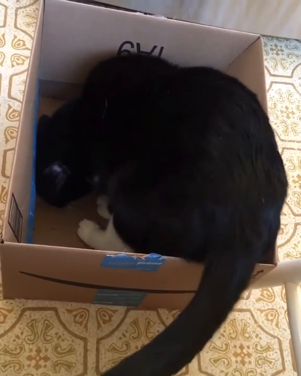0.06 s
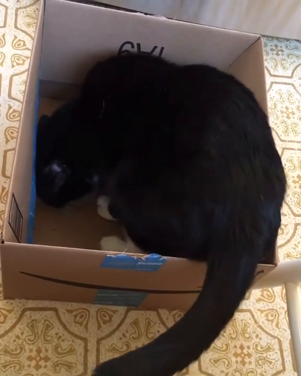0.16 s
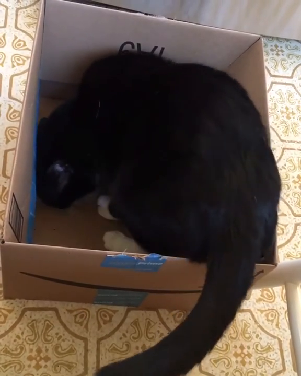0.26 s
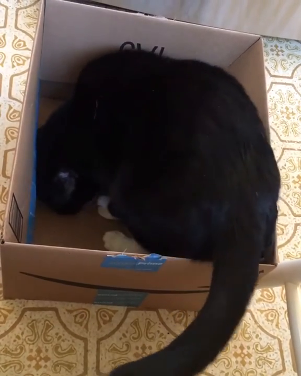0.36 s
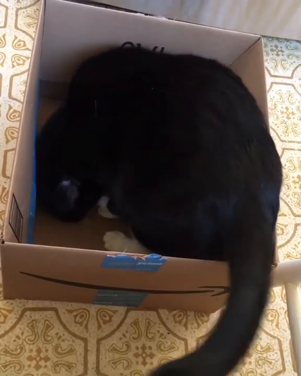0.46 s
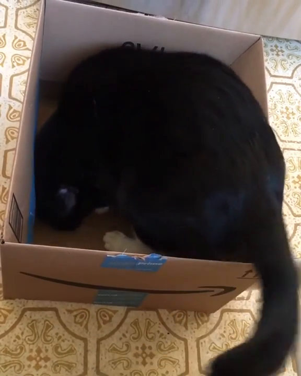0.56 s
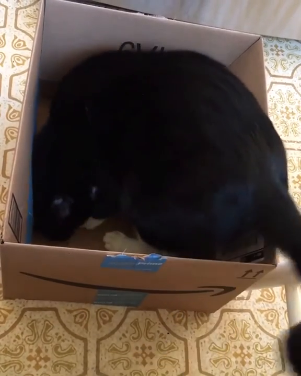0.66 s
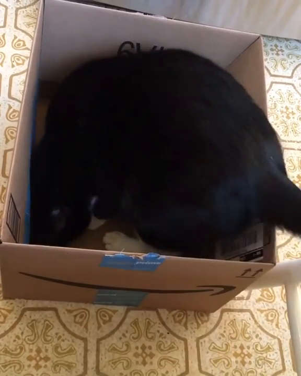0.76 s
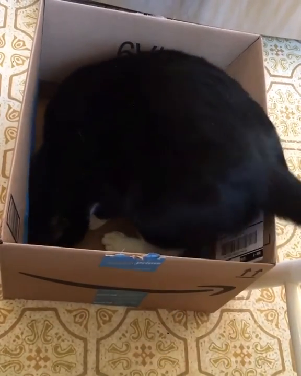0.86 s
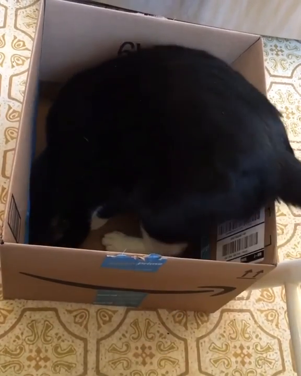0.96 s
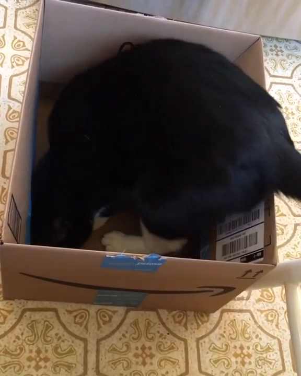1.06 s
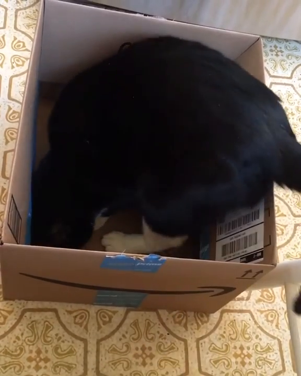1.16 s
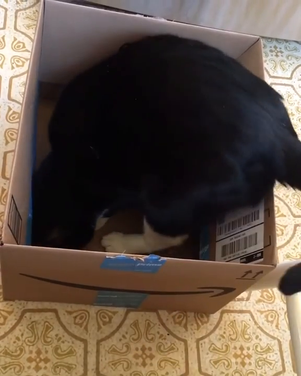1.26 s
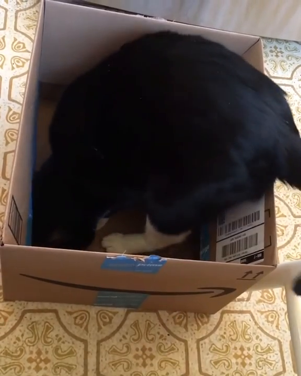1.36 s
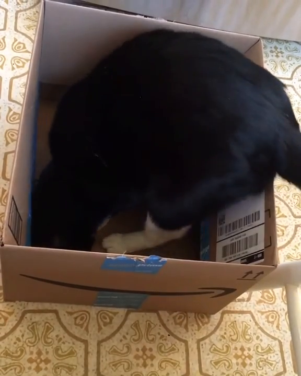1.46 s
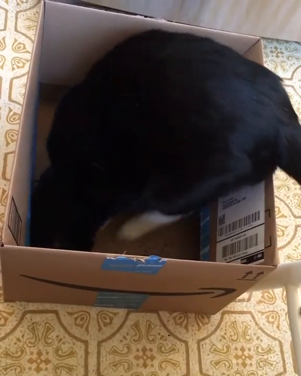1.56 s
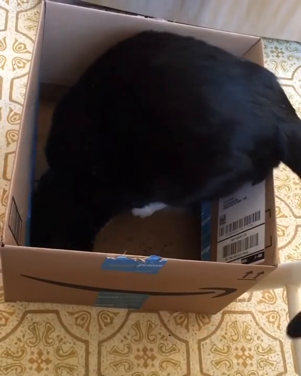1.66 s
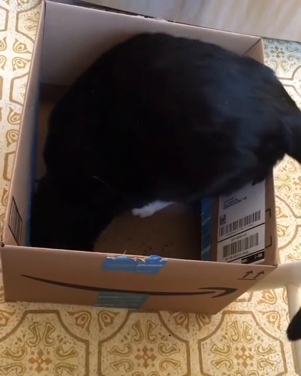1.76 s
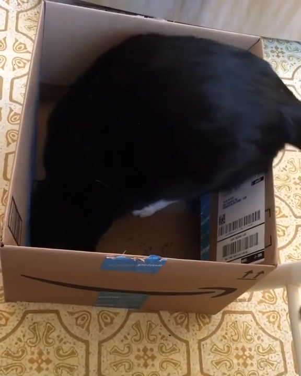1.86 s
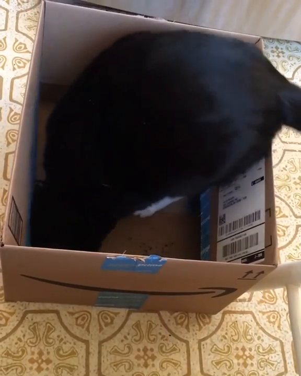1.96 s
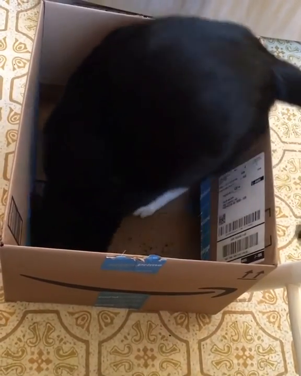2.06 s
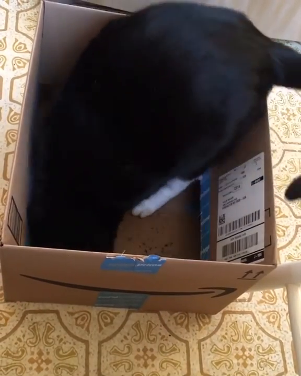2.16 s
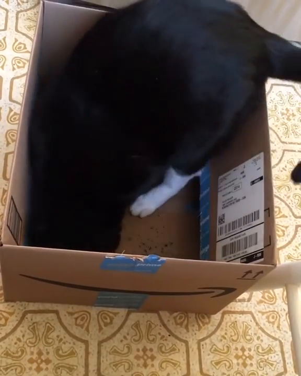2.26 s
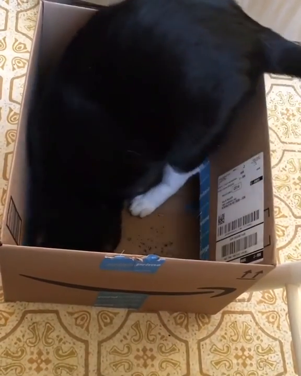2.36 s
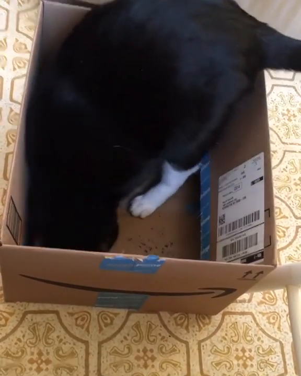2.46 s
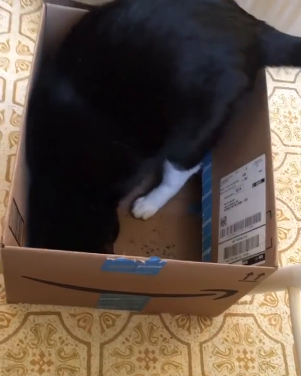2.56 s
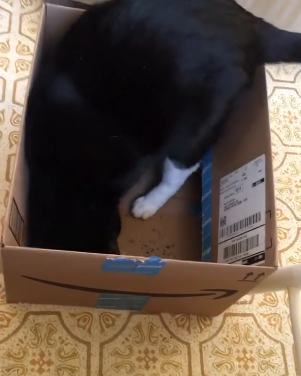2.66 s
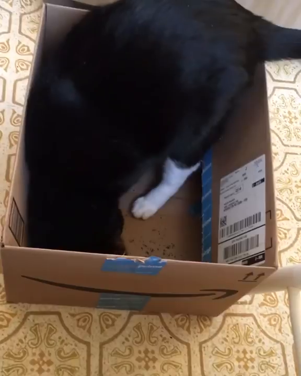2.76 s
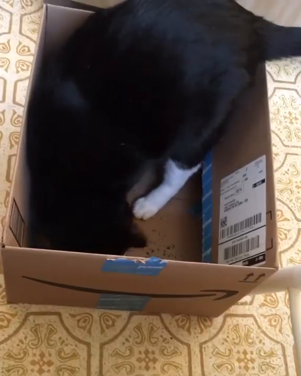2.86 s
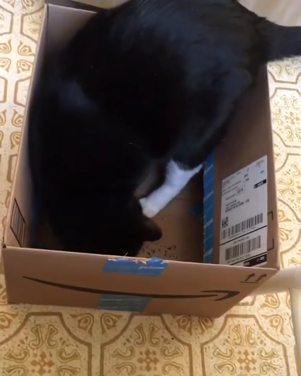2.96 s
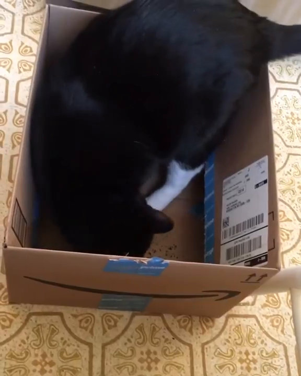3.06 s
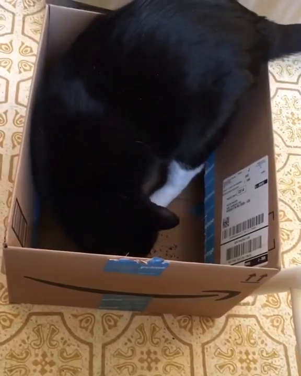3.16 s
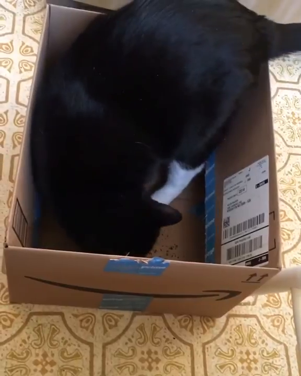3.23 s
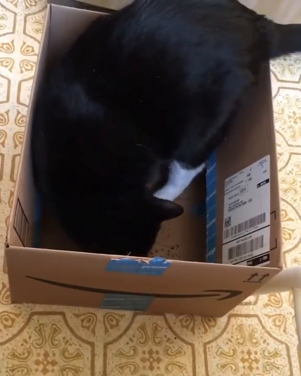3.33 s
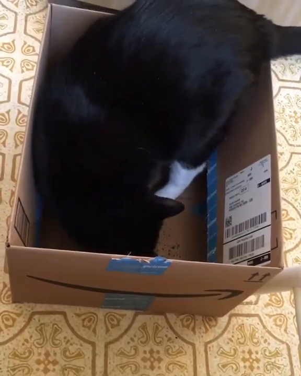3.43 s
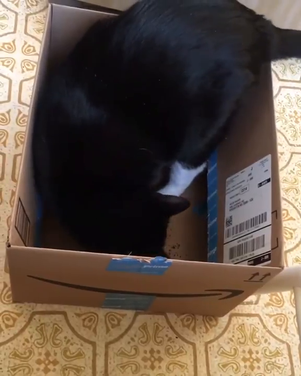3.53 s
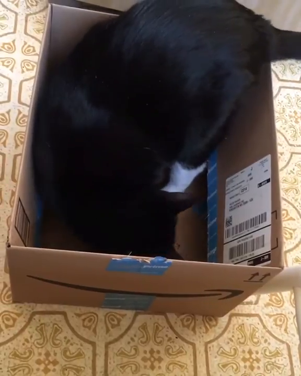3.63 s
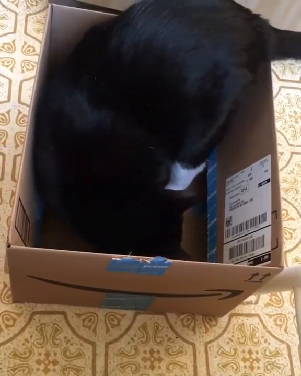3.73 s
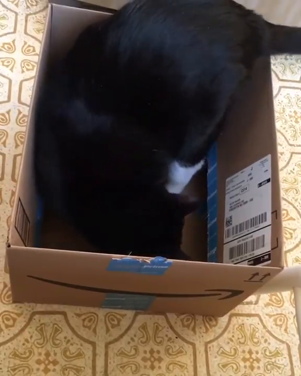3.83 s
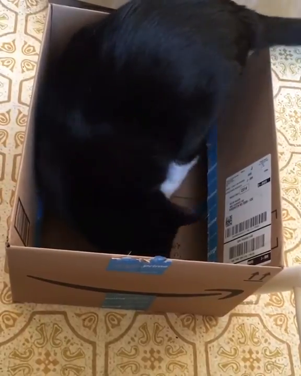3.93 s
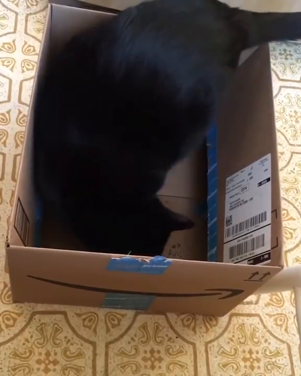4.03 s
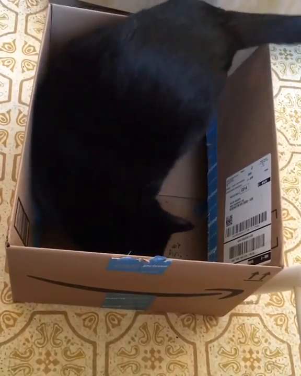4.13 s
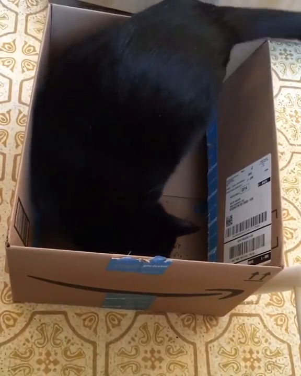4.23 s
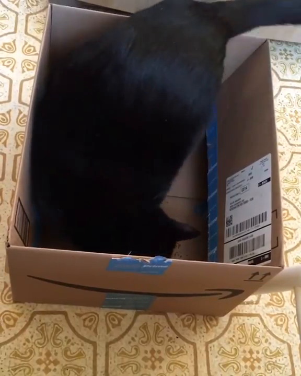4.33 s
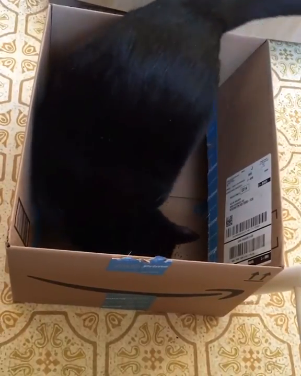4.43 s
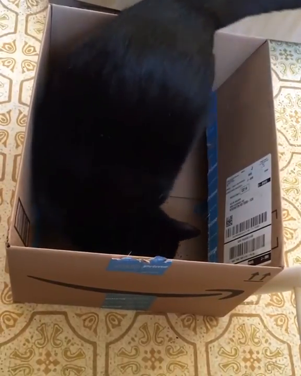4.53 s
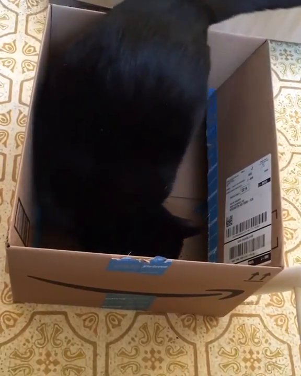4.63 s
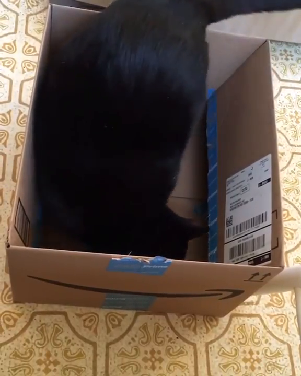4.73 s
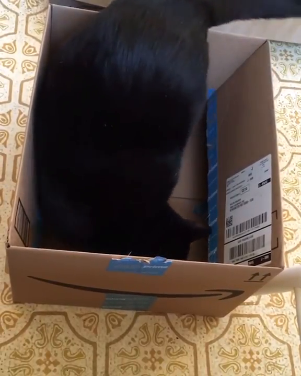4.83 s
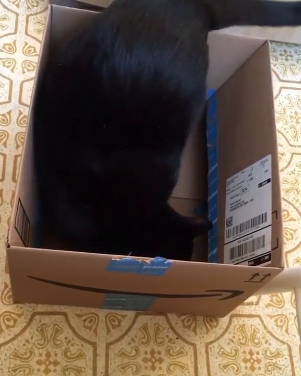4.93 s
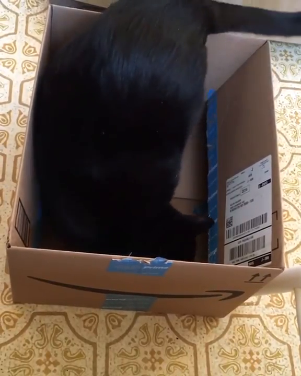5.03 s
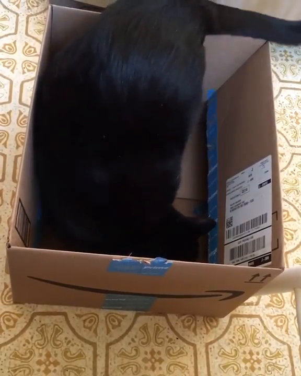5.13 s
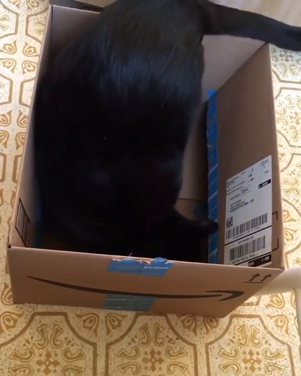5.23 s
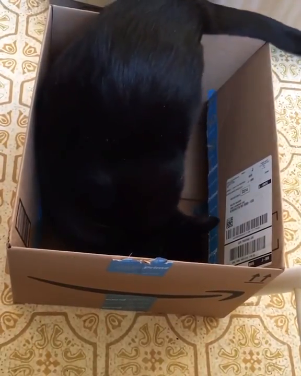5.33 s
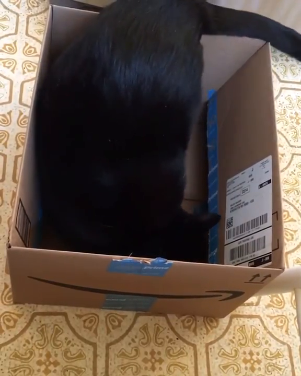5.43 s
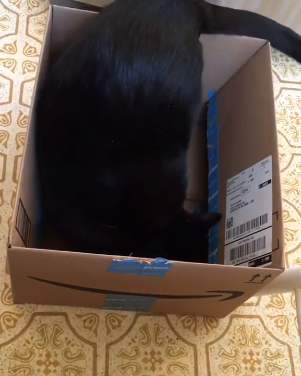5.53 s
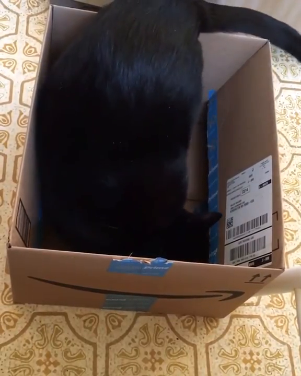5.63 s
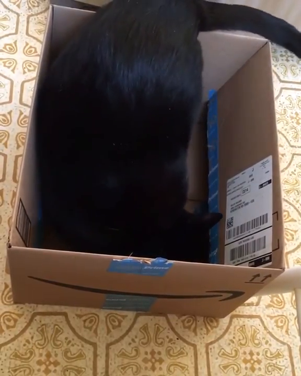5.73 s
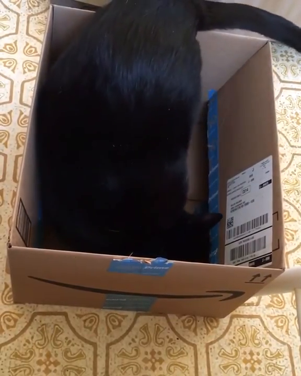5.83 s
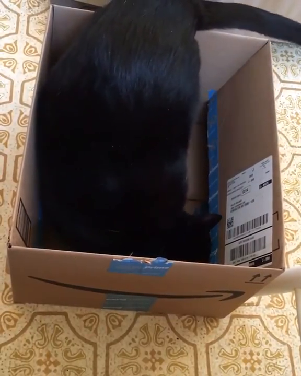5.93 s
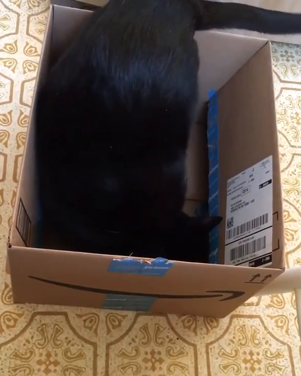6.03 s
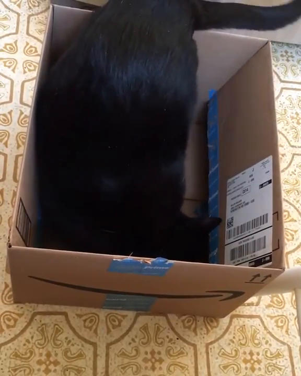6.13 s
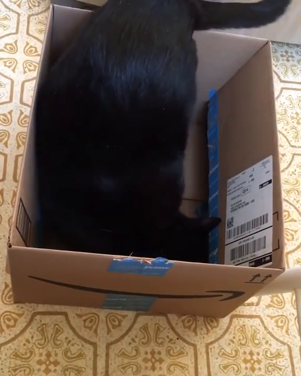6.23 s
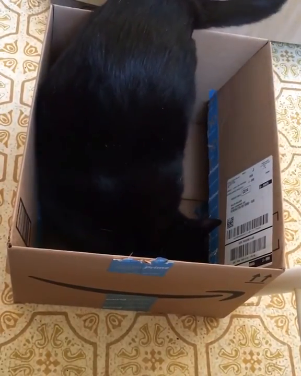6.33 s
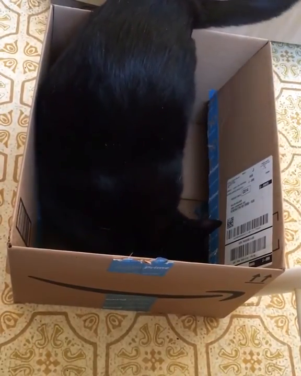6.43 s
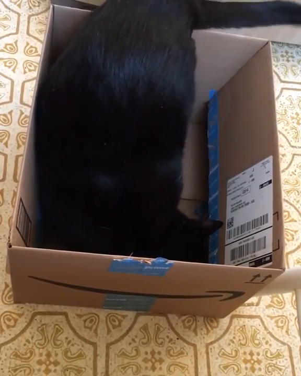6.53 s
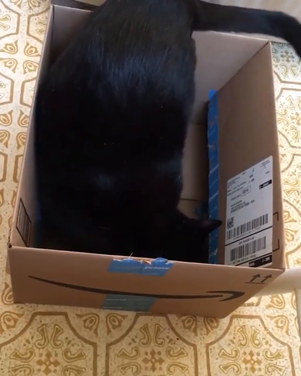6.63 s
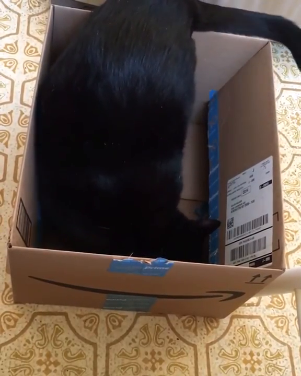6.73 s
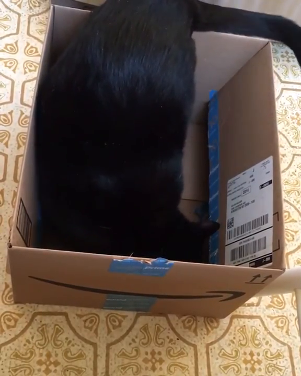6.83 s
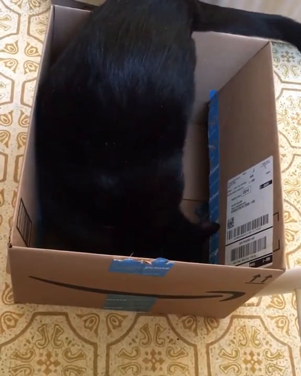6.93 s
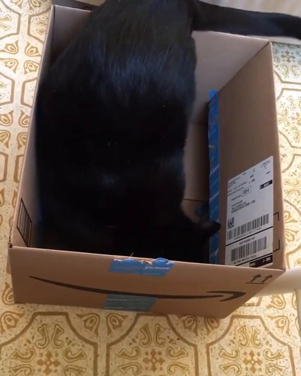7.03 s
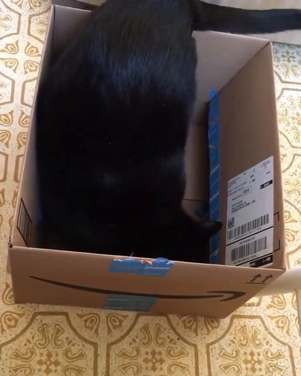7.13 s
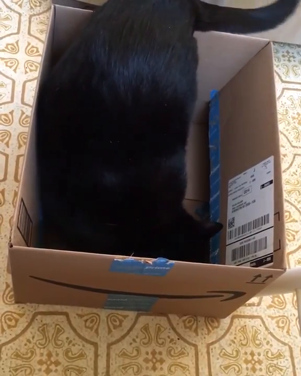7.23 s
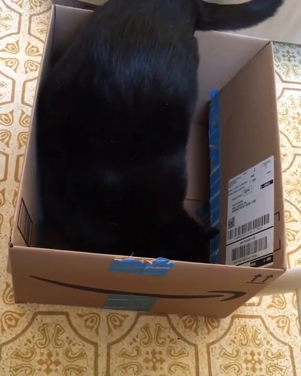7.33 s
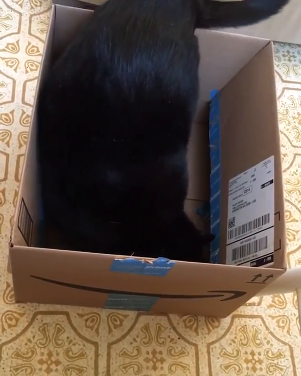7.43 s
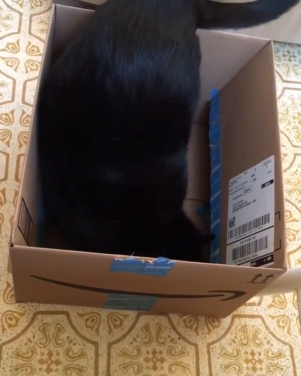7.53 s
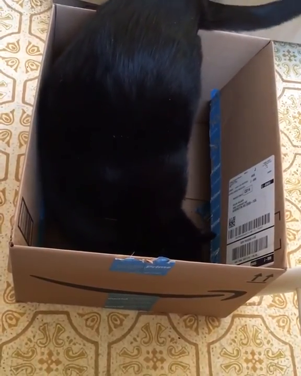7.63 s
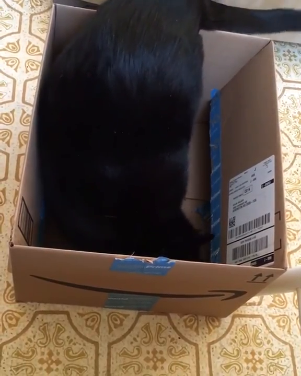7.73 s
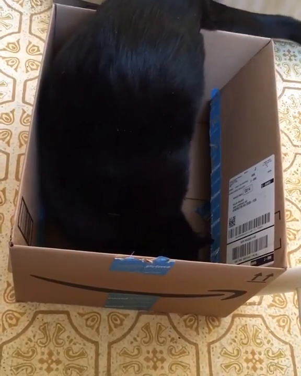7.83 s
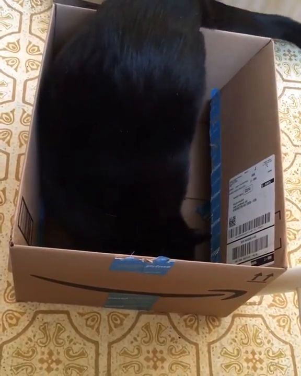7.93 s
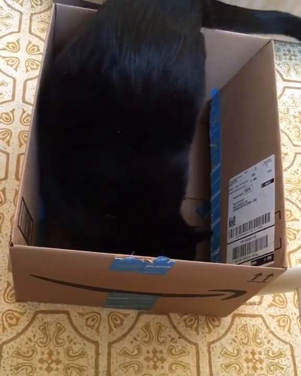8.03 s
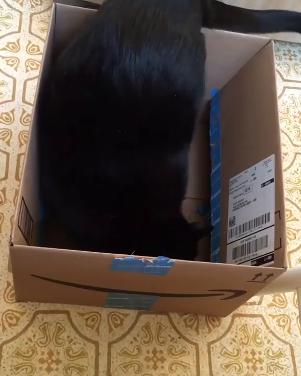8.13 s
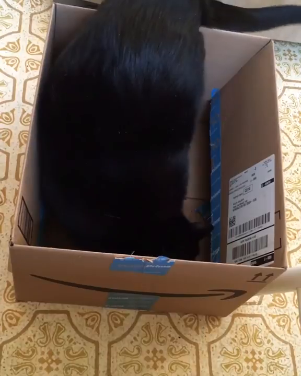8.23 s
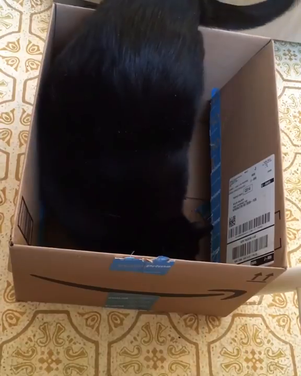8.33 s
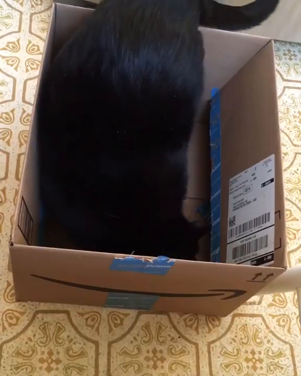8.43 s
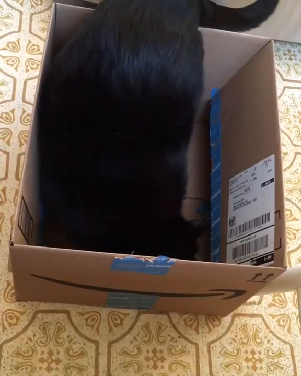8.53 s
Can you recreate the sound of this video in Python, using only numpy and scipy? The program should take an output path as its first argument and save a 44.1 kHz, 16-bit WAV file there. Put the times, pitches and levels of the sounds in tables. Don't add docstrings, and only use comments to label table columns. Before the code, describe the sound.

Close up, a cat turns in a cardboard box on a hard indoor floor. Fur brushes the walls, paws scuff, claws tick and snap the card. Around two seconds a sharp claw scrape and knock lands with a dull thump, the loudest moment. Afterwards come sparse crackles and small knocks over a steady low appliance hum and soft room rumble.

```python
import sys
import numpy as np
from scipy import signal
from scipy.fft import rfft, irfft
from scipy.io import wavfile

SR = 44100
rng = np.random.default_rng(int(sys.argv[2]) if len(sys.argv) > 2 else 0)


def level_to_linear(level):
    exponent = np.asarray(level, float) / 20
    return 10 ** exponent


def log_audio(samples):
    frames = np.atleast_2d(samples).T
    limited = np.clip(frames, -1, 1)
    pcm = np.round(limited * 32767).astype(np.int16)
    wavfile.write(sys.argv[1], SR, pcm)


N = 378819


def rms_one(x):
    return x / np.sqrt(np.mean(x ** 2) + 1e-20)


def at_hz(points, hz):
    points_hz, points_db = np.transpose(points)
    return np.interp(np.log(hz), np.log(points_hz), points_db)


def resonance(x, hz, width_hz):
    r = np.exp(-np.pi * width_hz / SR)
    top = [(1 - r * r) / 2, 0, (r * r - 1) / 2]
    return signal.lfilter(top, [1, -2 * r * np.cos(2 * np.pi * hz / SR), r * r], x)


def drift(rate_hz):
    r = np.exp(-2 * np.pi * rate_hz / SR)
    noise = rng.standard_normal(N + SR)
    return rms_one(signal.lfilter([1], [1, -2 * r, r * r], noise)[SR:])


def add(track, s, shape):
    at = max(round(s * SR), 0)
    track[..., at:at + shape.shape[-1]] += shape[..., :N - at]


def coloured(kind, level_db, *extra_db):
    colour_db, reach = kind
    return level_db + np.array(colour_db) + np.array(extra_db) @ np.array(reach)


def rub(power, kind, rows):
    for centre, half, *own_db in rows:
        t = np.arange(-2 * half, 3 * half, 1 / SR)
        bell = np.exp(-(t / np.where(t < 0, 0.54 * half, 1.17 * half)) ** 2)
        add(power, centre - 2 * half, level_to_linear(2 * coloured(kind, *own_db))[:, None] * bell)


# [t/s, level/dB]
FUR_PRESSURE = [(0.0, -69), (0.53, -73), (0.83, -61), (1.29, -66.5), (1.96, -63.5), (2.22, -69), (3.3, -77),
                (3.85, -74.5), (4.21, -71.5), (4.43, -79), (4.81, -77), (5.33, -77), (5.74, -73),
                (6.51, -76.5), (6.79, -73), (7.75, -76), (7.94, -72.5), (8.59, -74)]
LIGHT_TOUCH = [-73.5, -76.5, -79.5, -73.5]
PRESSURE_SHARE = [.35, .55, .9, 1.0]


def brushing():
    light_db, restless_db, restless_per_s = -76.5, 1, 2.5
    press_db = np.interp(np.arange(N) / SR, *np.transpose(FUR_PRESSURE)) - light_db
    press_db = press_db + restless_db * drift(restless_per_s)
    zones = zip(LIGHT_TOUCH, PRESSURE_SHARE)
    return np.array([level_to_linear(2 * (rest_db + share * press_db)) for rest_db, share in zones])


# [centre t/s, half length t/s, level/dB, weight level/dB]
FUR_STROKES = [(0.764, .02, -53.5, -10.5), (1.39, .015, -64, -20), (1.677, .012, -49, -16.5),
               (1.706, .013, -45.5, -19), (1.817, 0.017, -59, -8), (4.155, 0.014, -53.5, -14.5),
               (5.04, 0.024, -64.5, -7), (5.733, 0.04, -61.5, -9), (5.892, .018, -63, -16),
               (6.548, .011, -65, -2), (6.81, 0.052, -61, -32), (7.406, .079, -61, -21),
               (7.842, .016, -57.5, -9.5), (7.863, .04, -61, -28), (7.792, .015, -64, -28),
               (7.994, .012, -66, -8), (1.563, 0.034, -60, -7), (1.9, 0.046, -62, -13),
               (2.97, 0.048, -71, -12), (4.283, 0.14, -65.5, -9), (4.66, 0.065, -66.5, -12),
               (5.236, .03, -71.5, -12), (8.156, 0.057, -71, -13)]
FUR_COLOUR = [2, -1.1, -1.3, -0.44], [[1.01, 0.86, 0.48, 0]]


def fur_strokes(power):
    rub(power, FUR_COLOUR, FUR_STROKES)


# [centre t/s, half length t/s, level/dB, weight level/dB]
PAW_SCUFFS = [(0.148, 0.011, -55, -7.5), (0.277, 0.019, -58.5, -6), (0.572, 0.017, -52, -7.5),
              (0.938, 0.021, -48.5, -3.5), (2.425, 0.016, -61, -1), (2.706, 0.016, -61.5, -5),
              (4.019, 0.025, -61, -4), (4.2, .01, -66, -7), (4.587, .014, -63, -3), (4.762, .009, -54, -19),
              (4.803, 0.034, -62, -4), (4.403, .012, -62.5, 2)]
PAD_COLOUR = [-4, -2, -1.1, -1], [[1.01, 0.84, 0, 0.0041]]


def paw_scuffs(power):
    rub(power, PAD_COLOUR, PAW_SCUFFS)


# [centre t/s, half length t/s, level/dB, wall level/dB, tearing level/dB]
CLAW_DRAGS = [(0.643, .0086, -59.5, -8, 0), (.848, 0.015, -63, -1, -10), (2.032, .007, -50, -13, 7),
              (2.049, .019, -42, -12, 0), (2.091, 0.039, -58, 2.5, 2), (2.169, .015, -61, 0, -5),
              (4.395, 0.015, -57, -10, 1), (5.952, 0.013, -67, -19, -6), (6.88, .02, -75, 8, -1),
              (.8, 0.035, -64, -2, 2), (.89, .03, -67, 2, 0), (1.863, .03, -68.5, 4, -3),
              (2.2, .035, -71, -1, -10), (2.44, .018, -71, -8, -3), (4.03, 0.021, -69, -9, -3),
              (5.07, .02, -70, -4, -5)]
CLAW_COLOUR = [0.3, 0.5, -8.5, -1], [[1, 0, 0, 0.048], [0, 0, 0.21, 1]]


def claw_drags(power):
    rub(power, CLAW_COLOUR, CLAW_DRAGS)


def friction():
    power = brushing()
    fur_strokes(power)
    paw_scuffs(power)
    claw_drags(power)
    return np.sqrt(power)


# [t/s, level/dB, weight behind it level/dB]
FIBRE_TICKS = [(0.018, -56, -9), (0.5651, -67, -9), (0.6434, -62, -7), (0.736, -46, -22),
               (0.7582, -57, -12), (1.671, -54, -13), (1.804, -46.5, -12.5), (2.047, -40, -13),
               (2.0666, -44, -12), (2.2992, -59.5, -4), (2.4193, -49, -9), (2.449, -53, -13),
               (2.5044, -58, -11), (2.797, -58, -16), (3.887, -64, -7), (4.1226, -60, -20),
               (4.141, -61, -21), (4.1966, -45.5, -12), (4.2268, -51, -6), (4.602, -60, -16),
               (4.626, -56, -11), (5.084, -52, -11), (5.1, -55, -11), (5.88, -60, -10), (6.6053, -59, -12),
               (6.9373, -58.5, -13), (7.3452, -59.5, -16), (7.424, -52.5, -11.5), (7.7745, -52, -25),
               (7.8302, -55.5, -6)]
FIBRE_COLOUR = [0.22, -0.5, -1.1, 0.16], [[1.01, 1.1, .51, 0]]


def fibre_ticks():
    return [(s, coloured(FIBRE_COLOUR, *own_db)) for s, *own_db in FIBRE_TICKS]


# [t/s, level/dB, weight level/dB]
SKIN_SNAPS = [(0.2339, -64, -12), (0.4538, -52.5, -19), (0.4694, -62, -21), (0.5434, -51.5, -18.5),
              (0.719, -56, -16), (1.371, -42, -28), (1.4364, -63, -20), (2.9292, -52.5, -16.5),
              (4.743, -37, -19), (4.7564, -59, -14), (4.762, -57, -16), (5.9366, -57, -12),
              (0.108, -63, -13), (1.2685, -77, -14), (2.4019, -68, -3), (2.5531, -73, -11),
              (2.7866, -71, -10), (6.15, -67, -6), (6.555, -72, -9), (2.8235, -67, -10), (8.525, -68, -4),
              (4.574, -68, -12), (4.0017, -51, -14)]
SKIN_COLOUR = [1, 5, 1.6, -4.5], [[1.01, 0.96, 0, 0]]


def skin_snaps():
    return [(s, coloured(SKIN_COLOUR, *own_db)) for s, *own_db in SKIN_SNAPS]


# [t/s, level/dB, wall level/dB, tearing level/dB]
FOLD_CREASES = [(0.6628, -50, -14, -5), (0.84, -48.5, 12, -11), (2.0277, -41.5, 13, 0),
                (2.042, -37, -8, -5), (2.1494, -44.5, -1, -16), (4.8296, -65, 2, -6), (5.0558, -57, -14, 2),
                (6.3839, -61, -6, -20), (7.9824, -52, -7, -15), (4.0012, -52, -8, -1),
                (5.9354, -57.5, -16, -6), (4.3923, -58, -8, -5), (5.059, -64, -8, -10)]
FOLD_COLOUR = [-4, -1, -10.5, 1.5], [[0.24, 0, 0.1, 0], [0, 0.016, 0.36, 1]]


def fold_creases():
    return [(s, coloured(FOLD_COLOUR, *own_db)) for s, *own_db in FOLD_CREASES]


def fibre_slips():
    clumps_db = 1.5 * np.minimum(rng.exponential(1, N), 5) + 0.79 * drift(49) + 0.72 * drift(290)
    tears_per_s = 250
    tears = 8.4 * (rng.random((2, N)) < tears_per_s / SR) * rng.random(N)
    return rng.standard_normal((2, N)) * level_to_linear(clumps_db) + tears


ZONE_MIDDLES = [1150, 2900, 7400, 13500]
# [f/Hz, level/dB]
BOX_COLOUR = [(500, -42), (800, -4), (1500, -5), (2500, -2.5), (3600, -4), (5000, -4.5), (6500, -1.5),
              (8500, -10), (10500, -1), (12500, -4.5), (15000, -3)]


def card():
    edges = np.geomspace(520, 17500, 16)
    hz = np.sqrt(edges[1:] * edges[:-1])
    share = np.array([np.interp(np.log(hz), np.log(ZONE_MIDDLES), row) for row in np.eye(4)]).T
    level = np.exp(share @ np.log(friction()))
    snaps = np.zeros((len(hz), N))
    crackle_db, crackle_t60_s = -23.5, 0.064
    crackle = level_to_linear(crackle_db - 60 * np.arange(SR // 5) / SR / crackle_t60_s)
    breaks = fibre_ticks() + skin_snaps() + fold_creases()
    spreads_db = rng.standard_normal((len(breaks), len(hz)))
    all_gaps, all_sizes = rng.random((2, len(breaks), 6))
    for (s, zones_db), spread_db, gaps, sizes in zip(breaks, spreads_db, all_gaps, all_sizes):
        gain = level_to_linear(10.0 + share @ zones_db + spread_db)[:, None]
        for step, late in enumerate(np.cumsum(gaps) - gaps[0]):
            kick = 2.53 * gain * (0.37 + 0.84 * sizes[step]) * (-.8) ** step
            add(snaps, s + .0012 * late, kick)
        add(level, s, gain * crackle)
    slips = fibre_slips()
    zone_width_hz = share @ [1100, 2200, 4500, 5000]
    out = 0
    for k in range(len(hz)):
        sos = signal.butter(2, edges[k:k + 2], "band", fs=SR, output="sos")
        gain = level_to_linear(at_hz(BOX_COLOUR, hz[k])) * np.sqrt(SR / 2 / zone_width_hz[k])
        drive = level[k] * level_to_linear(1.6 * drift(25)) * rms_one(slips[k % 2]) + snaps[k]
        out = out + (-1) ** k * gain * signal.sosfilt(sos, drive)
    return out


# [t/s, peak level/dB, f/Hz, t60 t/s]
CLAW_KNOCKS = [(0.598, -46, 2110, 0.017), (0.663, -58, 2700, 0.013), (0.839, -42, 2550, 0.024),
               (0.964, -44, 1036, 0.042), (1.844, -47, 1150, 0.015), (2.027, -29, 1314, 0.033),
               (2.029, -23.5, 1526, 0.026), (2.15, -35.5, 1950, 0.017), (2.421, -45, 3130, 0.019),
               (3.979, -45, 1310, 0.016), (4.001, -39.5, 3560, 0.019), (4.393, -38, 2410, 0.015),
               (4.403, -40, 2290, 0.017), (4.832, -50, 1540, 0.017), (5.055, -50, 2460, 0.017),
               (5.933, -49, 3240, 0.018), (6.408, -51, 2060, 0.016), (6.522, -44.5, 1640, 0.016),
               (2.434, -52, 2300, 0.015), (5.062, -52, 3200, 0.02), (4.003, -50, 1250, 0.018),
               (7.982, -64, 3300, 0.015)]


def knocks():
    out, t = np.zeros(N), np.arange(SR // 10) / SR
    for (s, peak_db, hz, t60), luck in zip(CLAW_KNOCKS, rng.random((len(CLAW_KNOCKS), 3))):
        ratios = np.array([.72, 1, 1.35]) + 0.05 * luck
        modes = np.sin(2 * np.pi * hz * ratios[:, None] * t)
        ring = np.array([.5, 1, .5]) @ modes * (1 - np.exp(-t / 0.00015))
        add(out, s, level_to_linear(peak_db - 6.0 - 60 * t / max(t60, .004)) * ring)
    return out


# [t/s, peak level/dB, f/Hz, t60 t/s]
WEIGHT_THUMPS = [
    (1.70, -51, 175, 0.5),
    (2.03, -39, 228, 0.22),
    (2.03, -42, 652, 0.074),
]


def thumps():
    out, t = np.zeros(N), np.arange(SR // 2) / SR
    for s, peak_db, hz, t60 in WEIGHT_THUMPS:
        swell = 1 - np.exp(-t / 0.0057)
        add(out, s, level_to_linear(peak_db - 60 * t / t60) * swell * np.sin(2 * np.pi * hz * t))
    return out


def room(x):
    t60_s, level_db, gap_s = 0.22, -10, .004
    t = np.arange(SR // 2) / SR
    echoes = rng.standard_normal(len(t)) * level_to_linear(-60 * t / t60_s) * (t > gap_s)
    echoes = signal.lfilter([1], [1, -.4], echoes)
    return level_to_linear(level_db) * signal.fftconvolve(x, echoes / np.sqrt(np.sum(echoes ** 2)))[:N]


# [t/s, level/dB]
MOTOR_THROB = [(0.0, -56), (0.36, -61), (0.55, -55), (0.6, -74), (0.74, -54), (0.88, -60), (1.58, -60),
               (1.63, -53), (1.91, -69), (1.94, -49), (3.35, -61), (4.11, -53), (5.5, -55.5), (5.53, -66),
               (6.41, -53), (8.18, -59), (8.54, -49), (8.59, -55)]
# [f/Hz, level/dB]
MOTOR_SLOT_TONES = [(3565.5, -99), (3624.5, -92), (3743.3, -87.5), (3802.9, -95)]


def motor():
    whine_hz, whine_db, rotor_hz = 463.1, -59.5, 26.46
    throb_hz, beat_db, beats_per_s = 59.2, 2, 3
    t = np.arange(N) / SR
    turn = 2 * np.pi * rotor_hz * t
    phase = 2 * np.pi * whine_hz * t + 0.46 * np.sin(turn) + 0.28 * drift(4.5)
    swell = (1 - 0.15 * np.cos(turn)) * level_to_linear(0.29 * drift(3.5))
    whine = level_to_linear(whine_db) * swell * np.sin(phase)
    throb_db = np.interp(t, *np.transpose(MOTOR_THROB)) - 1.5 + beat_db * drift(beats_per_s)
    throb = level_to_linear(throb_db) * np.sin(2 * np.pi * throb_hz * t + 0.44 * drift(1.7))
    lines = sum(level_to_linear(db) * np.sin(2 * np.pi * hz * t) for hz, db in MOTOR_SLOT_TONES)
    faint = level_to_linear(1.5 * drift(3)) * lines
    return np.sqrt(2) * (whine + throb + faint)


# [f/Hz, level/dB per Hz]
AIR_COLOUR = [(22, -18), (35, -21), (55, -2), (90, -6.5), (130, -7), (200, -6.5), (330, -14), (520, -23),
              (630, -25), (750, -28), (1500, -38), (3700, -47.5), (5000, -49), (16000, -55.5)]
# [f/Hz, width f/Hz, level/dB]
RUMBLE_MODES = [(75.6, 13, -64), (149.2, 8, -66.5), (183.6, 9.5, -63.5), (212.8, 10.7, -62),
                (258.9, 11, -71), (291, 6.3, -69.5), (337, 6.4, -77), (624.7, 21, -75.5)]


def air():
    hz = np.arange(N // 2 + 1) * SR / N + 1e-3
    spectrum = rfft(rng.standard_normal(N)) * level_to_linear(at_hz(AIR_COLOUR, hz))
    out = level_to_linear(-52) * rms_one(irfft(spectrum, N))
    white = rng.standard_normal(N + SR)
    for mode_hz, width_hz, level_db in RUMBLE_MODES:
        once = resonance(white, mode_hz, width_hz)
        twice = resonance(once, mode_hz, width_hz)
        out += level_to_linear(level_db) * rms_one(twice[SR:])
    return out


def scene():
    box = card() + knocks() + thumps()
    return (box + room(box) + air() + motor())[None]


def low_pass(x):
    return signal.sosfilt(signal.butter(12, 16650, fs=SR, output="sos"), x)


# [f/Hz, width f/Hz, level/dB]
MIC_RESPONSE = [
    (4900, 1400, -5),
    (7850, 1700, -1.5),
    (10460, 690, -3.5),
    (15300, 2700, 1.5),
]


def record(dry):
    for hz, width_hz, gain_db in MIC_RESPONSE:
        dry = dry + (level_to_linear(gain_db) - 1) * resonance(dry, hz, width_hz)
    top_cut = signal.ellip(8, .5, 34, 15800, fs=SR, output="sos")
    mix = signal.sosfilt(top_cut, dry)
    return low_pass(mix)


dry = scene()
out = record(dry)
log_audio(out)
```